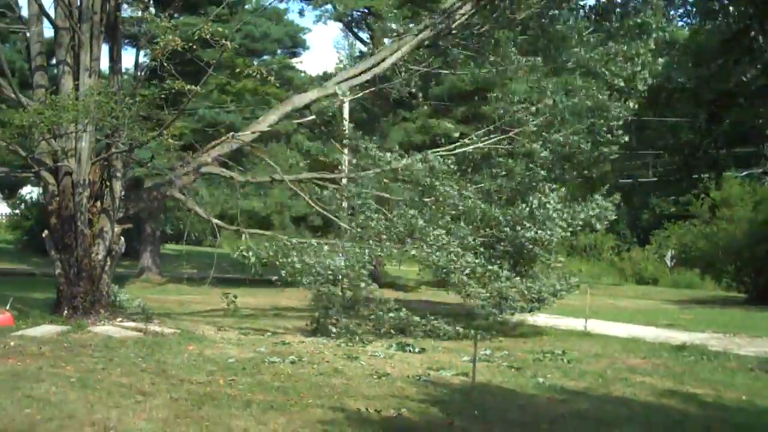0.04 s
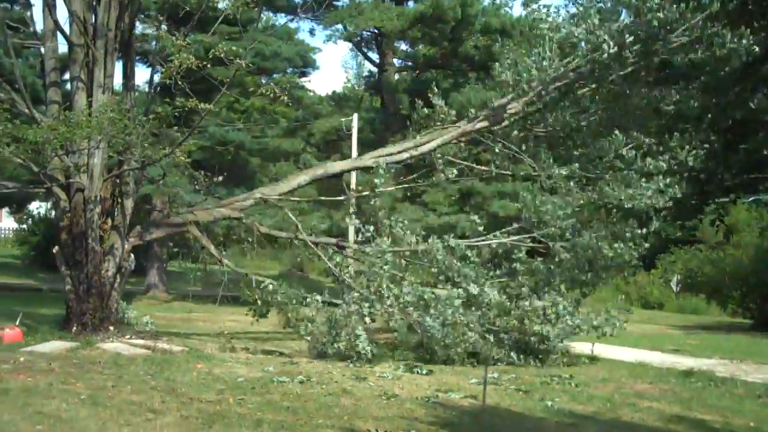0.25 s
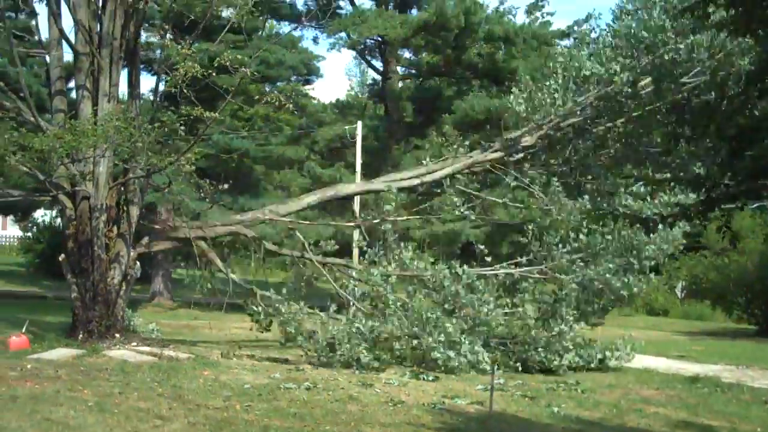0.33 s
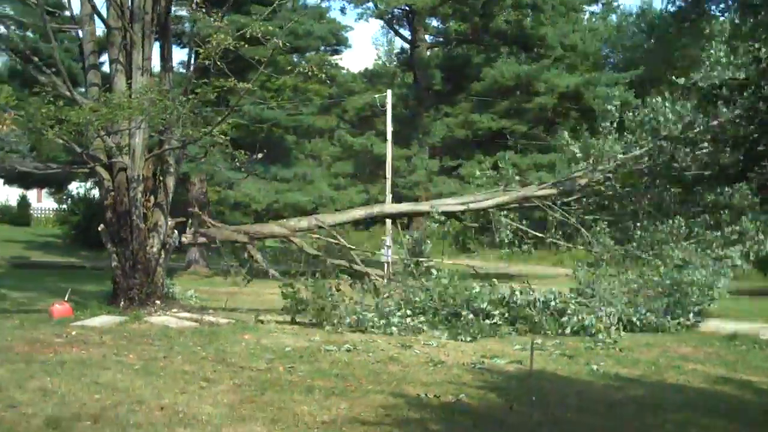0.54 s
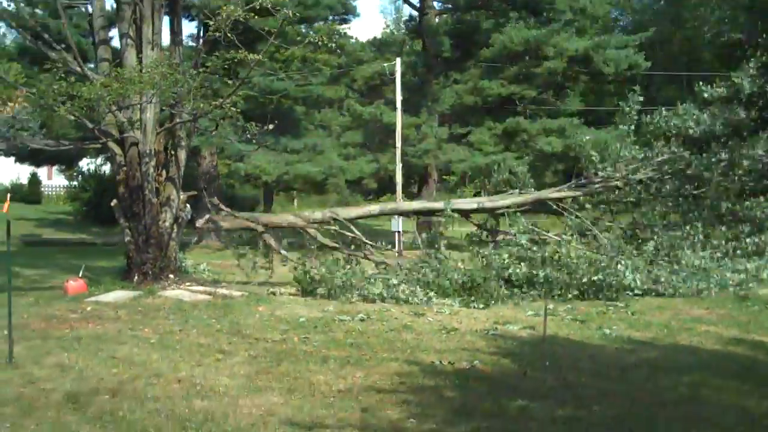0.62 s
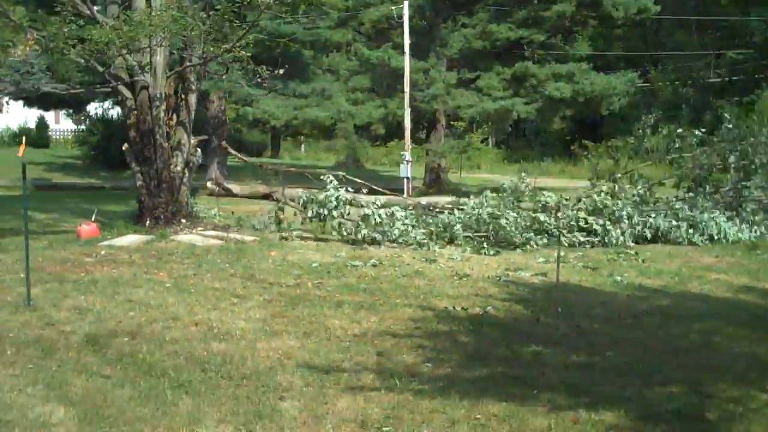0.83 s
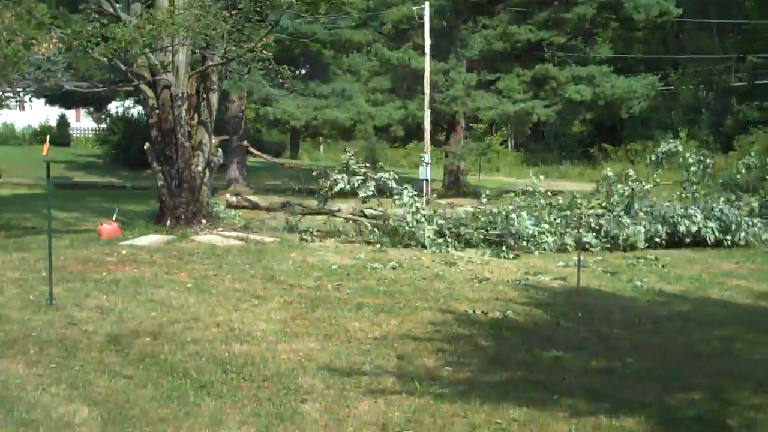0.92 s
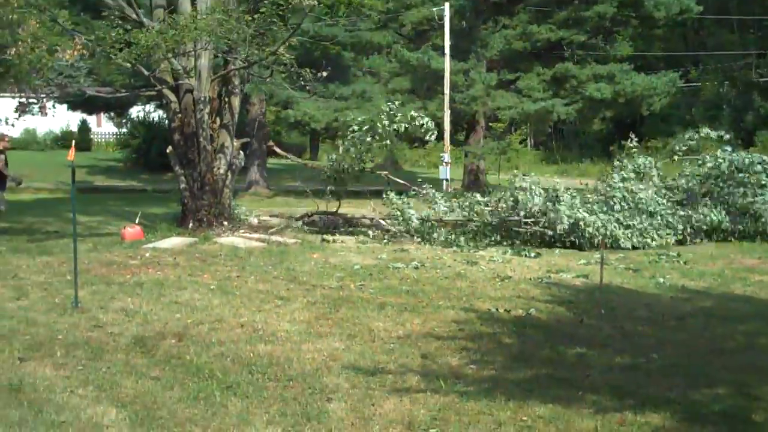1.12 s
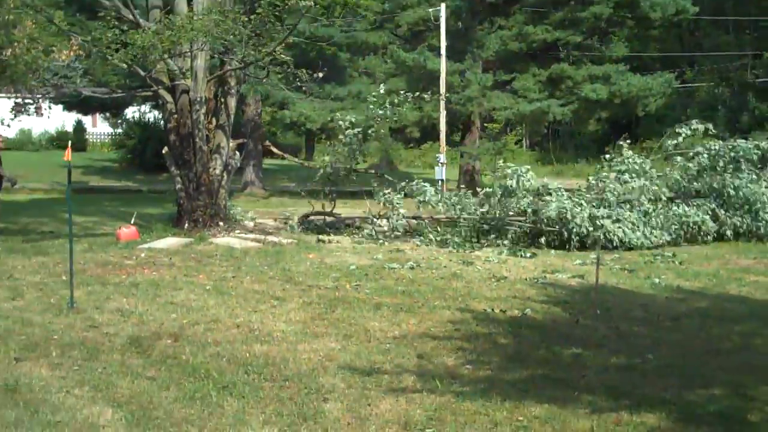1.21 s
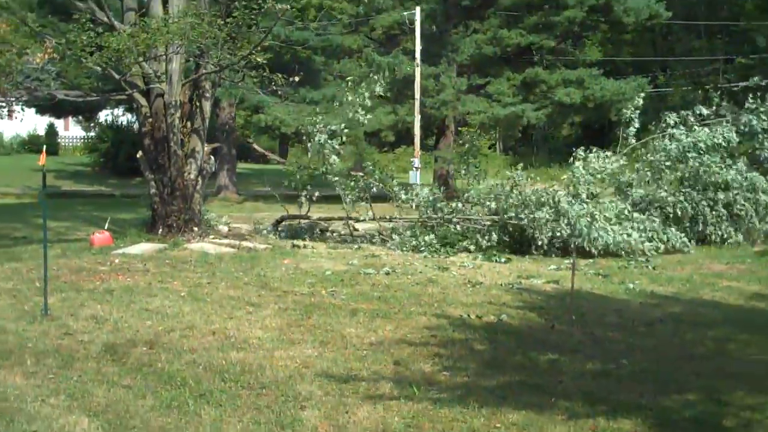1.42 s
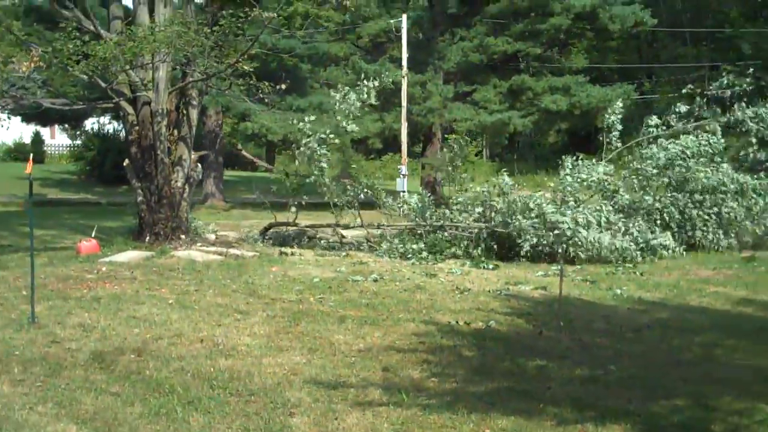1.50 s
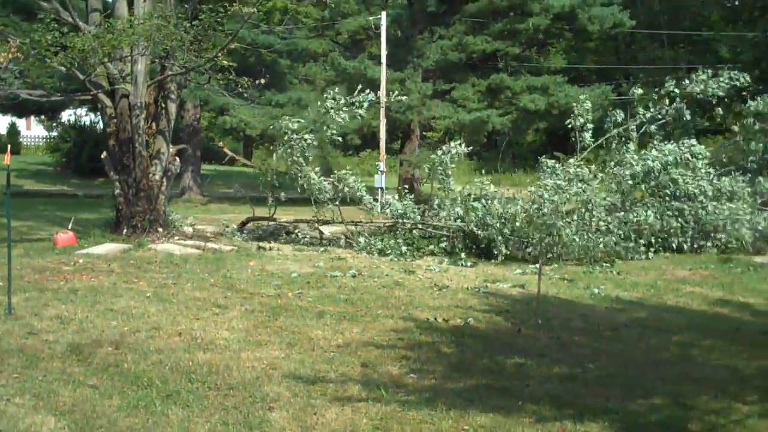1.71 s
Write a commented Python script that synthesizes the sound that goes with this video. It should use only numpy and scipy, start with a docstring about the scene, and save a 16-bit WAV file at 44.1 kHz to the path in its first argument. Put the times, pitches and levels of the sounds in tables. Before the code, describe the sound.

A big leafy tree limb splinters, cracks and crashes to the ground with rustling leaves.

```python
"""A big leafy limb tears off a tree and crashes onto a lawn, some way off.
First a chainsaw idles faintly while leaves begin to sweep the ground and thin sticks snap.
From 0.4 to 0.8 s branches splinter one after another. At 0.9 s the heavy wood knocks down,
and the trees around return a soft echo. Last, twigs and leaves settle,
leaving the saw, a faint hum and the outdoor air."""
import sys
import numpy as np
from scipy import signal
from scipy.io import wavfile

SR = 44100
rng = np.random.default_rng(int(sys.argv[2]) if len(sys.argv) > 2 else 0)


def dump(signal):
    """Clip the signal to [-1, 1] and save it as 16-bit WAV at the path in sys.argv[1]."""
    limited = np.clip(np.atleast_2d(signal).T, -1, 1)
    pcm = np.round(limited * 32767).astype(np.int16)
    wavfile.write(sys.argv[1], SR, pcm)


N = 77175
T = np.arange(N) / SR

# Each branch breaking: (time [s], fade [s], hiss level [dB], crack level [dB], crack pitch [Hz],
# ring level [dB], ring pitch [Hz], overload thump peak [dB])
BRANCH_BREAKS = [(0.3967, 0.014, -26.5, -33, 4150, -26.5, 1237, -34),
                 (0.4912, 0.0098, -25, -27.5, 4100, -44, 850, -32),
                 (0.5469, 0.0075, -20.5, -21, 3120, -18.5, 1277, -26),
                 (0.7217, 0.0052, -22, -20, 4350, -12, 1338, -29),
                 (0.7911, 0.0059, -24, -18, 2330, -20, 1338, -31.5),
                 (0.8002, 0.00083, -41, -10.5, 2500, -15.5, 1648, -37)]
# Tone of the splintering hiss: (frequency [Hz], level [dB])
HISS_TONE = [(30, -16), (300, -5.5), (1000, -3), (3000, -12), (5500, 4), (8000, -2.5), (14000, -1)]
# Tone of the crack: (multiple of its pitch, level [dB])
CRACK_TONE = [(.02, -55), (.08, -41), (.3, -10), (.6, 8), (1, 8.5), (1.4, 6), (2.2, -11), (5, -42)]
# Tone of the overloaded microphone's thump: (frequency [Hz], level [dB])
OVERLOAD_THUMP_TONE = [(20, -5), (100, -1), (220, -1), (350, -2), (700, -4), (1200, -13.5), (2500, -21),
                       (8000, -46)]
def breaking_branches():
    """Each branch splinters with a hiss and a crack, then rings;
    the loud crack overloads the microphone with a low thump."""
    out = np.zeros(N)
    thump_lag_s, ring_lag_s = 0.00198, 0.001555
    for s, fade_s, hiss_db, crack_db, crack_hz, ring_db, ring_hz, thump_db in BRANCH_BREAKS:
        hiss = shape_tone(tearing_fibres(fade_s), HISS_TONE)
        crack = shape_tone(tearing_fibres(fade_s, blow_db=-6), CRACK_TONE, crack_hz)
        add(out, s, burst(hiss, hiss_db, fade_s))
        add(out, s, burst(crack, crack_db, fade_s))
        add(out, s + thump_lag_s, pulse(OVERLOAD_THUMP_TONE, thump_db))
        add(out, s + ring_lag_s, ringing_wood(ring_db, ring_hz))
    return out


def tearing_fibres(fade_s, blow_db=-100, size=6000):
    """Wood fibres give way in a quick, dying run of clicks; blow_db sets one early sharp blow."""
    t = T[:size]
    rise = np.minimum(t / 0.00024, 1)
    run = clicks(per_s=14000, spread_db=1, size=size) * rise * np.exp(-t / fade_s)
    add(run, 0.0008, amp([blow_db]) * np.linalg.norm(run))
    return run


# The notes in a green branch: (multiple of its pitch, level [dB], time to fade by 60 dB [s])
WOOD_NOTES = [(0.461, -10, 0.016), (.55, -14.5, .018), (0.999, -2.5, 0.031), (1.12, -12, 0.031),
              (1.42, -16, 0.023), (1.91, -7.5, 0.023), (2.34, -8.5, 0.021)]
def ringing_wood(db, hz, size=4000):
    """A green branch rings briefly, with its bass filtered away."""
    t = T[:size]
    notes = sum(amp(note_db - 60 * t / ring_s) * np.sin(2 * np.pi * (hz * ratio * t + rng.random()))
                for ratio, note_db, ring_s in WOOD_NOTES)
    rise = np.minimum(t / 0.00067, 1)
    bass_cut = signal.butter(2, 300, "high", fs=SR)
    return amp(db) * signal.lfilter(*bass_cut, rise * notes)


# Heavy wood hitting the ground: (time [s], level [dB], pitch [Hz], fade [s])
LANDING_KNOCKS = [(.905, -13, 1070, 0.00079), (0.913, -25, 1500, 0.0025), (.9262, -26, 1440, 0.0022),
                  (0.929, -24, 1680, 0.0013), (.940, -25, 1110, .003), (0.943, -23.5, 1780, 0.001)]
# Tone of a knock: (multiple of its pitch, level [dB])
KNOCK_TONE = [(.03, -58), (.09, -36), (.17, -19), (.4, -3.5), (.65, -3), (1, -8), (1.5, 0.5), (2.3, -12),
              (3.2, -14.5), (8, -27.5)]
def landing_limb():
    """The limb lands and clatters on its own branches."""
    out = np.zeros(N)
    for s, db, hz, fade_s in LANDING_KNOCKS:
        knock = shape_tone(tearing_fibres(fade_s, blow_db=1), KNOCK_TONE, hz)
        add(out, s, burst(knock, db, fade_s))
        add(out, s, ringing_wood(db - 3, hz=1206))
    return out


# Each stick snapping: (time [s], level [dB], pitch [Hz], fade [s])
STICK_SNAPS = [(0.1708, -30, 7500, 0.0017), (0.1718, -30, 3300, 0.0013), (.218, -35, 3520, 0.0032),
               (.4065, -31, 4600, 0.0076), (.568, -30.5, 4500, 0.0027), (.633, -31, 6250, 0.003),
               (.657, -27, 2710, 0.0041), (0.6629, -25.5, 2860, 0.0029), (0.6681, -24, 3000, 0.0034),
               (.740, -20.5, 2900, 0.0019), (0.764, -22, 4000, 0.0014), (.7765, -27, 1896, 0.006),
               (.8055, -23, 2630, 0.0045), (.8102, -27, 2440, 0.00096), (.8162, -50, 2500, 0.0016),
               (.837, -43, 2500, 0.0042), (.8525, -22.5, 2600, 0.00084), (.885, -26, 2380, 0.0014),
               (.968, -27.5, 2580, 0.0044), (1.372, -41, 5500, 0.0032)]
# Tone of a snap: (multiple of its pitch, level [dB])
SNAP_TONE = [(.05, -64), (.35, -18), (.6, -7), (.8, -2.5), (1, -0.5), (1.4, -4), (2.2, -13.5), (5, -29.5)]
def snapping_sticks():
    """Each thin stick gives one short crack."""
    out = np.zeros(N)
    for s, db, hz, fade_s in STICK_SNAPS:
        snap = shape_tone(tearing_fibres(fade_s), SNAP_TONE, hz)
        add(out, s, burst(snap, db, fade_s))
    return out


# How loud the leaves, twigs and leafy crown are: (time [s], level [dB])
LEAF_LOUDNESS = [(0, -43), (.08, -48.5), (.16, -42), (.22, -38.5), (.36, -35), (.52, -37.5), (.575, -32),
                 (.615, -39), (.68, -33.5), (.712, -38), (.74, -32.5), (.83, -34.5), (.93, -38),
                 (1.05, -43.5), (1.2, -49), (1.45, -49), (1.75, -51)]
TWIG_LOUDNESS = [(0, -49), (.15, -52), (.35, -46.5), (.53, -52.5), (.57, -41), (.62, -49), (.71, -45),
                 (.75, -38), (.86, -36.5), (.94, -34), (1.0, -36), (1.1, -44), (1.25, -47.5), (1.45, -53),
                 (1.75, -56)]
CROWN_LOUDNESS = [(0, -68), (.8, -50), (1.05, -42), (1.3, -51.5), (1.55, -51), (1.75, -51.5)]
# The tone of each: (frequency [Hz], level [dB])
LEAF_TONE = [(30, -42), (120, -26), (400, -14.5), (1000, -9.5), (1800, -4), (3000, 0.5), (5000, 0.5),
             (8000, -4), (12000, -3.5), (14000, -2)]
TWIG_TONE = [(30, -46), (90, -29), (170, -12.5), (350, -11.5), (650, 0), (950, -1), (1300, 2.5),
             (2500, 3.5), (4000, -2.5), (7000, -8.5), (14000, -20)]
CROWN_TONE = [(30, -52), (120, -37), (600, -7), (1400, -13.5), (2700, 0.5), (4500, 2), (6000, -1.5),
              (8000, -7), (14000, -10)]
def foliage():
    """Leaves sweep air and grass, twigs crackle under the weight, and the crown sways to rest."""
    leaves = level(LEAF_LOUDNESS) * rustle(LEAF_TONE, 13000, spread_db=2, blur_db=-1, clump_db=1.23)
    twigs = level(TWIG_LOUDNESS) * rustle(TWIG_TONE, 1800, spread_db=0, blur_db=-4, clump_db=1.53)
    crown = level(CROWN_LOUDNESS) * rustle(CROWN_TONE, 3500, spread_db=2, blur_db=-2, clump_db=1.3)
    return leaves + twigs + crown


def rustle(tone, per_s, spread_db, blur_db, clump_db, clumps_per_s=140):
    """Countless tiny touches come in clumps, over a blur of more distant ones."""
    clumps = amp(clump_db * np.interp(T * clumps_per_s, np.arange(N), rng.standard_normal(N)))
    touches = clicks(per_s, spread_db, N) + amp(blur_db) * rng.standard_normal(N)
    return evened(shape_tone(touches * clumps, tone))


# Tone of the echo: (frequency [Hz], level [dB])
ECHO_TONE = [(60, -15), (300, -13), (1000, -10), (3000, 0.5), (14000, -7.5)]
def tree_echo(sound, db=-12, delay_s=0.0069, die_away_s=0.58):
    """Trunks and leaves scatter the sound back as a thin, dying echo."""
    bounces = clicks(per_s=4000, spread_db=4.5, size=N) * amp(-60 * T / die_away_s) * (T > delay_s)
    tail = shape_tone(bounces, ECHO_TONE)
    return amp(db) * signal.fftconvolve(sound, tail / np.linalg.norm(tail))[:N]


# How fast the saw's engine runs: (time [s], speed [turns per s])
ENGINE_SPEED = [(0, 29.6), (.25, 42), (1.2, 44.6), (1.75, 46)]
# Its harder firings: (time [s], peak level [dB])
ENGINE_POPS = [(.066, -51), (.096, -53), (.127, -51), (.158, -45), (.187, -51), (.2125, -47), (.2415, -47),
               (.2695, -49), (.2965, -49), (.325, -48), (1.305, -46), (1.3698, -48), (1.481, -49),
               (1.5262, -48), (1.5717, -50), (1.6588, -47)]
# Tone of an exhaust puff: (frequency [Hz], level [dB])
PUFF_TONE = [(40, -20), (100, -11), (175, 4), (260, 6), (400, 2), (650, -3), (1200, -10), (4000, -39)]
def idling_chainsaw():
    """The two-stroke engine puffs once a turn and now and then fires harder."""
    speed = np.interp(T, *np.transpose(ENGINE_SPEED)) * (1 + 0.004 * rng.standard_normal())
    turns = np.cumsum(speed) / SR
    puffs = np.diff(np.floor(turns), prepend=0) * amp(3 * rng.standard_normal(N))  # uneven strength
    out = -amp(-72) * evened(shape_tone(puffs, PUFF_TONE))
    for s, db in ENGINE_POPS:
        add(out, s, pulse(PUFF_TONE, db))
    return out


# Tone of the air: (frequency [Hz], level [dB])
AIR_TONE = [(10, 19), (30, -37), (80, -9), (170, 3), (400, -14.5), (2000, -14), (14000, -18.5)]
def outdoor_air(db=-64.5):
    """Still outdoor air makes a soft, steady rush."""
    return amp(db) * evened(shape_tone(rng.standard_normal(N), AIR_TONE))


def hum(db=-79.5, hz=179, width_hz=7):
    """A faint, low hum wavers in pitch."""
    waver = signal.lfilter([1], [1, -np.exp(-np.pi * width_hz / SR)], rng.standard_normal(N))
    return amp(db) * np.sqrt(2) * np.sin(2 * np.pi * hz * T + 0.63 * evened(waver))


def amp(db):
    """Turns decibels into a multiplier."""
    return 10 ** (np.asarray(db) / 20)


def evened(x):
    """Scales a sound to an average (rms) size of 1."""
    return x / np.sqrt(np.mean(x ** 2) + 1e-20)


def level(points):
    """Joins (time [s], level [dB]) points into a volume curve."""
    return amp(np.interp(T, *np.transpose(points)))


def add(mix, s, sound):
    """Mixes a sound in at s seconds."""
    part = mix[max(round(s * SR), 0):][:len(sound)]
    part += sound[:len(part)]


def shape_tone(x, tone, hz=1, size=4096):
    """Filters a sound through a tone table, whose first column is multiplied by hz."""
    freqs, db = np.transpose(tone)
    grid = abs(np.fft.fftfreq(size, 1 / SR))
    log_gain = np.log(amp(np.interp(np.log(grid + 1), np.log(freqs * hz + 1), db)))
    response = np.exp(np.conj(signal.hilbert(log_gain)))  # nothing rings before the sound starts
    taps = np.fft.ifft(response).real[:size // 2]
    return signal.fftconvolve(x, taps)[:len(x)]


def clicks(per_s, spread_db, size):
    """Tiny random clicks; more spread_db makes a few stand out."""
    strength = amp(spread_db * np.minimum(rng.exponential(1, size), 4))
    return evened(strength * rng.choice([-1, 1], size) * (rng.random(size) < per_s / SR))


def burst(x, db, fade_s):
    """Gives a sound the energy of one that starts at db and dies away over fade_s."""
    return amp(db) * x * np.sqrt(fade_s * SR / 2 / (np.sum(x ** 2) + 1e-20))


def pulse(tone, db):
    """One blunt pulse that peaks at db."""
    shape = shape_tone(signal.unit_impulse(2048), tone)
    return -amp(db) * shape / abs(shape).max()


def scene():
    """Mixes the wood and its echo with the foliage and the background."""
    air = outdoor_air()
    wood = breaking_branches() + snapping_sticks() + landing_limb()
    return (wood + tree_echo(wood) + foliage() + idling_chainsaw() + hum() + air)[None]


def record(dry):
    """Cuts away the highest treble."""
    taps = signal.firwin(401, cutoff=13950, window=("kaiser", 7), fs=SR)
    return signal.oaconvolve(dry, taps[None], "same")


dry = scene()
out = record(dry)
dump(out)
```